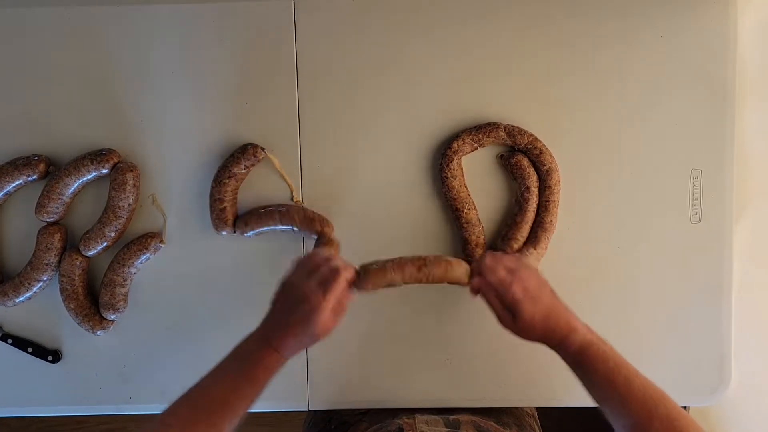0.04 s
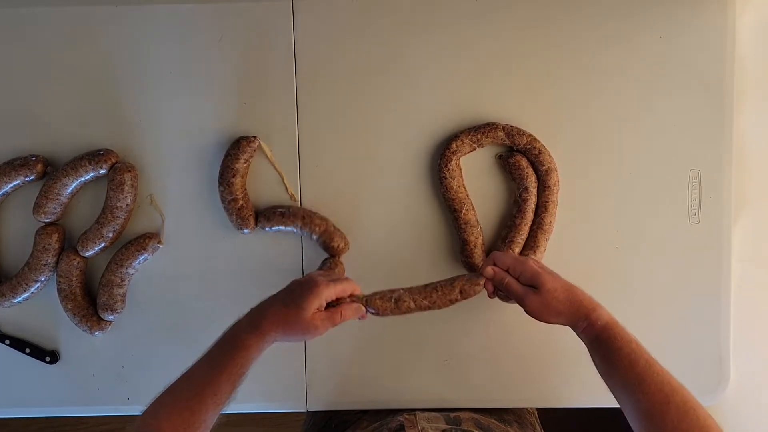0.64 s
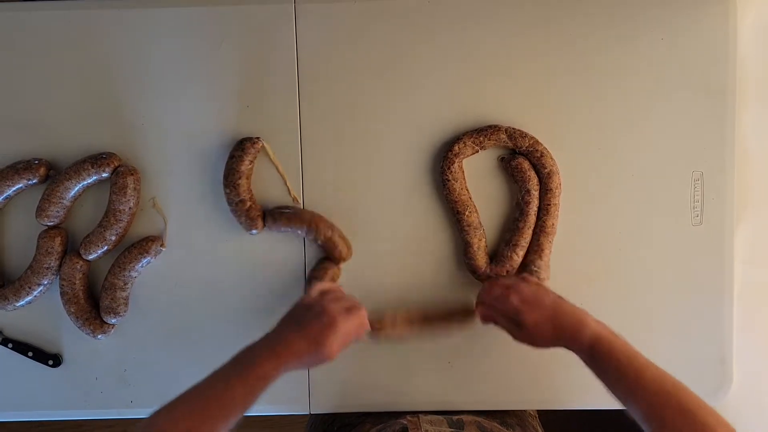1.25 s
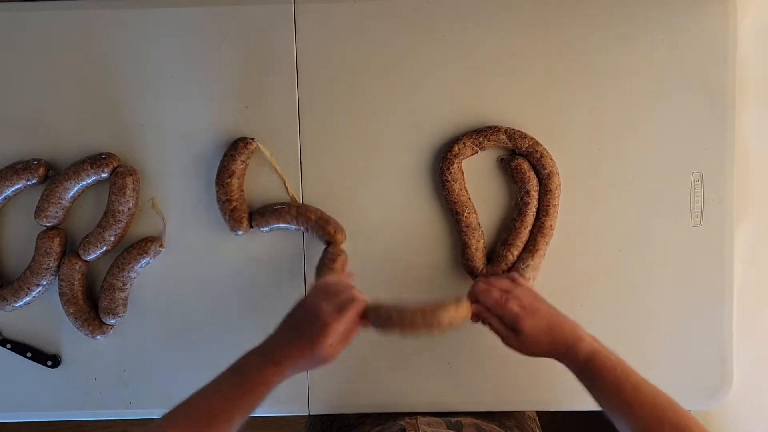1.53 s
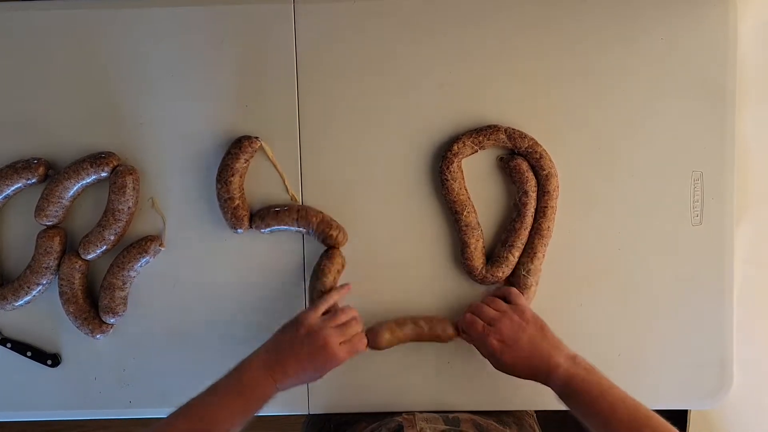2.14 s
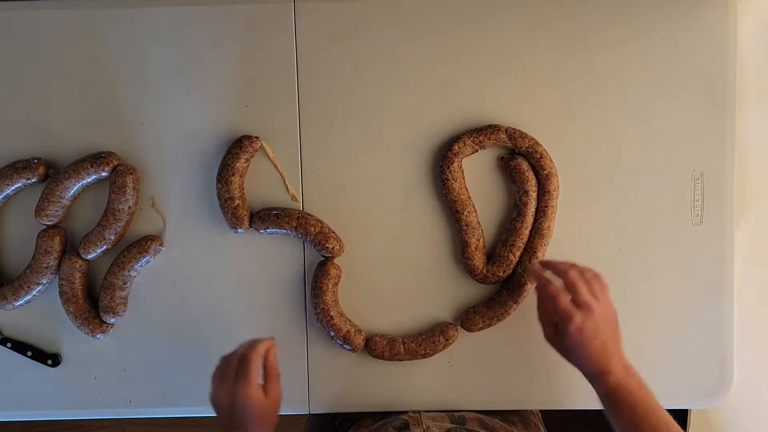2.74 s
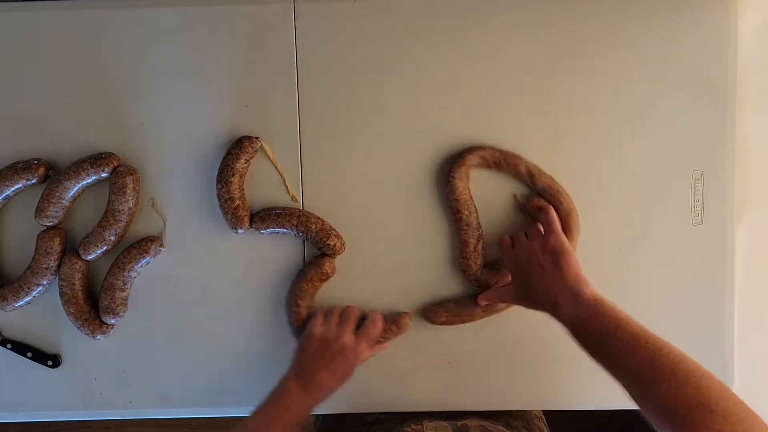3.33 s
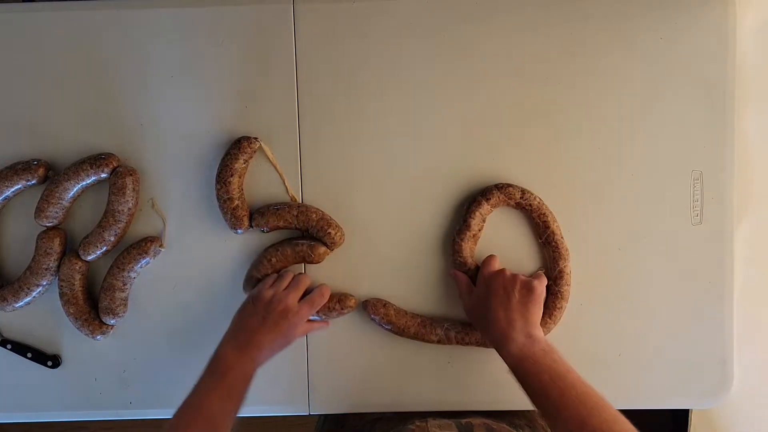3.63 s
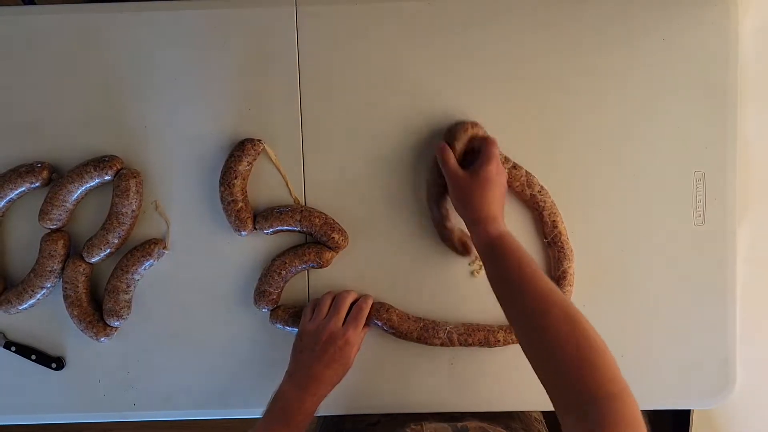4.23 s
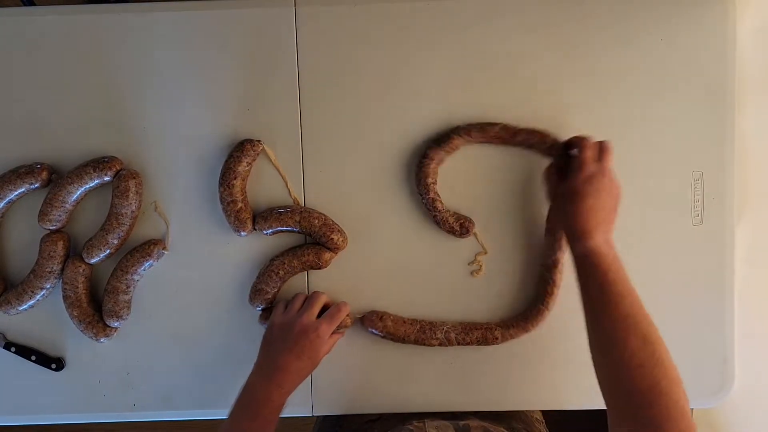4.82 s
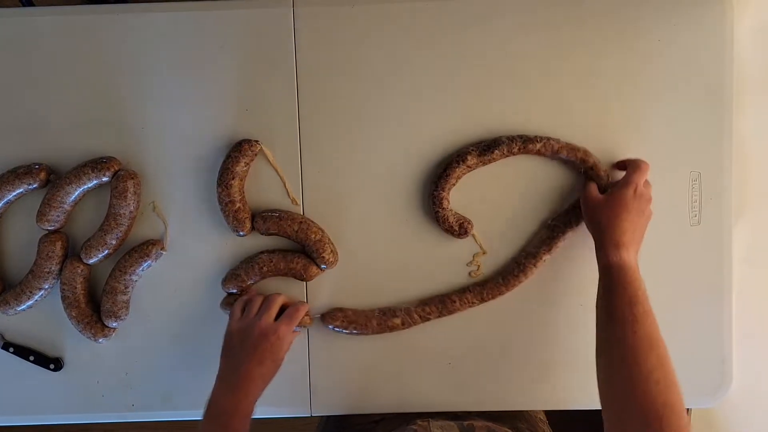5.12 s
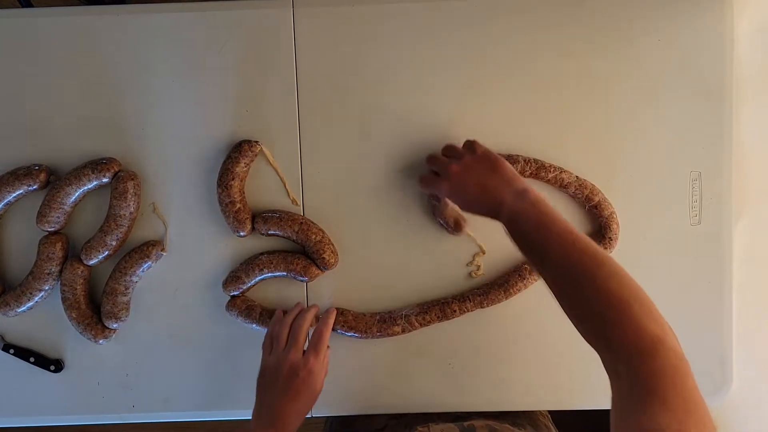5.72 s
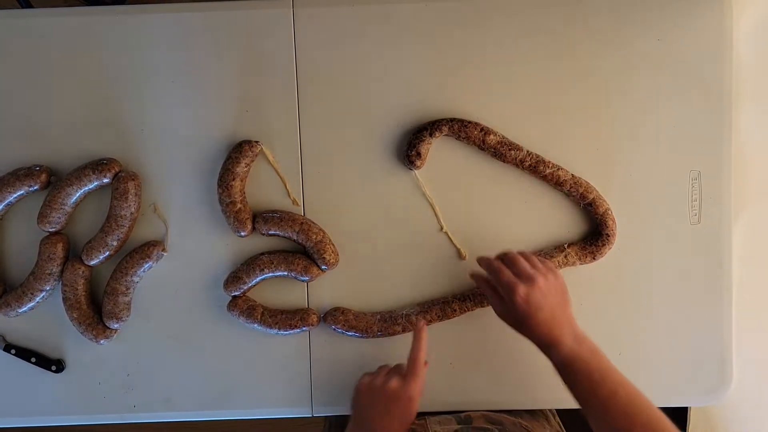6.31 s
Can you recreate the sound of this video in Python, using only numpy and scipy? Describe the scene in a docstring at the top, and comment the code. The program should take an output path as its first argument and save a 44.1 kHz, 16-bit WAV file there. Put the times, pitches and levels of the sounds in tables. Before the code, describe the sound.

Raw sausages smack and thump on a plastic tabletop, then are quietly shifted and dragged, with sticky ticks in a small room.

```python
"""Sausage links are twirled, dropped and dragged on a hollow plastic folding table in a small room.
Three hard slaps open it, each a wet smack over the low boom of the panel. After a tiny finger squeak
at 1 s comes a run of lighter slaps. From about 2.3 s hands shift the coil: squelching rubs, sticky
ticks, dull bumps, a few soft taps and a thin sliding hiss. A faint appliance hum goes on throughout."""
import sys
import numpy as np
from scipy import signal
from scipy.fft import rfft, irfft
from scipy.io import wavfile
from scipy.ndimage import uniform_filter1d

SR = 44100
rng = np.random.default_rng(int(sys.argv[2]) if len(sys.argv) > 2 else 0)


def log_audio(samples):
    """Write samples as a 16-bit WAV file to the path given in sys.argv[1]."""
    # one column per channel
    frames = np.atleast_2d(samples).T
    # limit to full scale, then quantise
    limited = np.clip(frames, -1, 1)
    pcm = np.round(limited * 32767).astype(np.int16)
    wavfile.write(sys.argv[1], SR, pcm)


N = 280464
HZ = np.fft.rfftfreq(N, 1 / SR)

# sausage slapping the table: t/s, relative smack level/dB, relative boom level/dB, contact time/s
SAUSAGE_SLAPS = [(0.0379, -17, -17, 0.0037), (0.2494, -15.5, -14.5, 0.0027), (0.4863, -19, -16, 0.0041),
                 (1.3186, -25, -36, 0.0031), (1.5088, -23.5, -27, 0.0021), (1.6785, -29.5, -29, 0.0063),
                 (1.8605, -23.5, -23.5, 0.0033), (2.057, -35, -37.5, 0.0049), (2.2228, -40, -39.5, 0.0063),
                 (2.2814, -38, -51, 0.0068), (4.037, -38.5, -61.5, 0.0026), (4.386, -47, -53, 0.0028),
                 (4.655, -41, -50, .0034), (5.374, -38, -54, 0.0022)]
# tone of wet casing meeting plastic: f/Hz, gain/dB
SMACK_EQ = [(100, -30), (350, 2), (700, -4.5), (1300, 1), (2000, -2), (2900, -6.5), (3600, -10.5),
            (4400, -15.5), (7300, -18.5), (8600, -26), (10500, -30), (12500, -16), (16000, -27.5)]
# tone of casing sliding: f/Hz, gain/dB
HISS_EQ = [(60, 2.5), (170, 0.5), (280, 3.5), (450, -2.5), (1300, -3), (3200, -3), (4600, -11.5),
           (7400, -9), (8500, -22), (10700, -19), (13000, -8.5), (16000, -15.5)]


def table_boom(boom_db=8, ring_db=-17.5, ring_per_db=0.6347, bump_t60_s=0.26):
    """The weight of each slap or bump sets the hollow top booming and its higher modes ringing."""
    # the whole top flexing, a close pair that swells and beats: f/Hz, relative level/dB
    flex_modes = [(64.5, 0), (76.5, -1.5)]
    # the dead thud of the push, then the higher panel modes: f/Hz, relative level/dB, t60/s
    panel_modes = [(146, 7.5, 0.037), (97.5, 1.5, 0.13), (218, -0.5, 0.1), (238.8, 0.5, 0.13),
                   (271.2, 1.5, 0.32), (333.8, -3, 0.16), (413, -17.5, 0.49), (519.5, -18.5, 0.45),
                   (607.4, -6, 0.12), (810, -17, 0.27), (958, -16, .13)]
    # hands and coil pressing on the top, with no smack: t/s, relative boom level/dB, ring level/dB
    bumps = [(0.125, -35, -46), (0.402, -44.5, -46), (1.279, -52, -57.5), (2.355, -47, -46.5),
             (3.1, -43.5, -48.5), (3.143, -44, -40), (4.261, -55.5, -58.5), (5.065, -59, -53.5),
             (5.6742, -36, -44.5)]
    out, t = np.zeros(N), np.arange(SR // 2) / SR
    push = 1 - np.exp(-t / 0.00093)  # soft meat loads the panel gradually
    blows = []
    for s, _, db, _ in SAUSAGE_SLAPS:
        t60 = np.interp(db, [-30.5, -19], [0.4, 0.23])  # a hard blow flattens the meat, damping the boom
        blows.append((s, db, ring_db + ring_per_db * db, t60))
    blows += [(*bump, bump_t60_s) for bump in bumps]
    for s, low_db, panel_db, t60 in blows:
        boom = ring([(hz, db, t60) for hz, db in flex_modes], t, scatter_db=4)
        panel = ring(panel_modes, t, scatter_db=3)
        add(out, s, push * (amp(low_db + boom_db) * boom + amp(panel_db) * panel))
    return room(out, direct_db=0, early_db=-30, tail_db=-22)[:, :N]


def ring(modes, t, scatter_db):
    """Dying modes of alternating sign; their strengths vary with the spot that is struck."""
    sizes = amp(scatter_db * rng.standard_normal(len(modes)))
    return sum((-1) ** k * sizes[k] * amp(db - 60 * t / t60) * np.sin(2 * np.pi * hz * t)
               for k, (hz, db, t60) in enumerate(modes))


def smacks(gain_db=-4.5, snap_db=12, pocket_hz=2916):
    """Wet casing meets plastic: trapped air snaps out in a quick burst of tiny clicks."""
    out, t = np.zeros((2, N)), np.arange(SR // 16) / SR
    for s, db, _, contact in SAUSAGE_SLAPS:
        envelope = (1 - np.exp(-t / 0.00046)) * np.exp(-t / contact)
        burst = envelope * rng.choice([-1., 1.], len(t))
        burst[SR // 1000] += amp(snap_db)
        smack = pocket(colour(burst, SMACK_EQ), pocket_hz, db=-1.5, q=2.7)
        add(out, s, amp(db + gain_db) * room(smack, direct_db=0, early_db=-3, tail_db=-6))
    return out


def pocket(x, hz, db, q):
    """A wet pocket under the casing resonates and gives a burst its pitch."""
    resonance = signal.lfilter(*signal.iirpeak(hz, q, SR), x)
    return x + amp(db) * x.std() * unit(resonance)


def ticks(gain_db=3):
    """Small patches of sticky casing let go, each with one bright click."""
    # casing coming unstuck: t/s, relative level/dB
    releases = [(0.127, -37.5), (0.214, -33), (1.612, -40), (2.244, -49), (2.371, -38), (2.504, -48),
                (3.197, -29), (5.066, -44), (5.385, -34)]
    out, t = np.zeros((2, N)), np.arange(SR // 100) / SR
    for s, db in releases:
        burst = np.exp(-t / 0.00061) * rng.choice([-1., 1.], len(t))
        tick = colour(burst, SMACK_EQ, tilt=2)
        add(out, s, amp(db + gain_db) * room(tick, direct_db=0, early_db=-3, tail_db=-7))
    return out


def rubs(gain_db=-1):
    """Moist casing is rubbed or peeled: each short squelch swells and crackles away."""
    # strokes on the casing: t/s, relative level/dB, length/s, squelch f/Hz
    strokes = [(0.21, -38, 0.023, 2040), (1.191, -60, 0.037, 3280), (1.398, -54.5, .04, 3070),
               (1.586, -53, 0.037, 2360), (1.825, -51.5, 0.02, 3160), (2.222, -41.5, 0.05, 600),
               (2.228, -46.5, 0.023, 13000), (2.418, -55.5, 0.11, 2480), (2.49, -44.5, 0.023, 2800),
               (3.122, -41.5, 0.058, 3100), (3.188, -30.5, 0.036, 2670), (3.675, -47.5, 0.021, 785),
               (3.738, -50.5, 0.042, 2180), (3.777, -47.5, 0.025, 2980), (3.895, -55, 0.12, 2500),
               (4, -47.5, 0.015, 2770), (4.377, -50, 0.055, 1850), (4.577, -43.5, 0.025, 1520),
               (4.642, -45, .044, 2480), (4.744, -48.5, .047, 2970), (4.764, -43.5, 0.049, 590),
               (5.365, -41.5, 0.037, 1940), (5.619, -37, 0.035, 265), (5.644, -48.5, 0.063, 3060),
               (6.004, -55, 0.042, 580), (6.049, -58, 0.056, 3150)]
    # tone of a moist rub: f/Hz, gain/dB
    squelch_eq = [(60, -4.5), (170, -3.5), (280, 4.5), (430, -6), (650, 1.5), (1300, 2), (2200, 2),
                  (3200, -0.5), (4300, -5), (7300, -9), (8600, -20.5), (10800, -20), (12800, -11.5),
                  (16000, -28.5)]
    # the tighter the squelch, the brighter the whole rub: squelch f/Hz, tilt/(dB per octave)
    brightness = [(270, -5.5), (1600, -3.5), (3100, -1.5), (13000, 7)]
    out = np.zeros((2, N))
    for s, db, length, hz in strokes:
        progress = np.linspace(0, 1, int(length * SR))
        swell = np.sin(np.pi * progress ** .5)
        stroke = unit(swell * grains(SR // 8, spread_db=3)[:len(swell)])
        squelch = pocket(colour(stroke, squelch_eq, read(brightness, hz)), hz, db=-5, q=5.5)
        add(out, s, amp(db + gain_db) * room(squelch, direct_db=-5, early_db=-7, tail_db=-9))
    return out


def squeak(start_s=1.033, gain_db=-50, length_s=.015, centre_hz=1500, glide=0.058, rough=0.56):
    """A finger slips on the casing with a short rising chirp."""
    out, sweep = np.zeros((2, N)), np.linspace(-1, 1, int(length_s * SR))
    grip = 1 + rough * unit(uniform_filter1d(rng.standard_normal(len(sweep)), size=24))
    phase = 2 * np.pi * np.cumsum(centre_hz * (1 + glide * sweep)) / SR
    chirp = grip * np.cos(np.pi * sweep / 2) * np.sin(phase)
    add(out, start_s, amp(gain_db) * room(chirp, direct_db=0, early_db=-12, tail_db=-14, lag_s=.0001))
    return out


def slide(gain_db=-2, fingers_db=-69):
    """The drags of the coil, over the faint rustle of fingers that never quite stop."""
    # the coil dragged or twirled over the top: t/s, length/s, relative level/dB, tilt/(dB per octave)
    drags = [(0, 0.67, -53, -1), (1.14, 1, -58, 0), (2.099, 0.47, -59, -1.5), (3.18, 0.53, -56, 1.5),
             (3.871, 0.58, -64.5, 2), (4.749, 0.4, -54.5, -0.9), (5.048, 0.51, -58.5, -2),
             (5.702, 0.25, -62.5, 0)]
    out = np.zeros(N)
    for s, length, db, tilt in drags:
        add(out, s, amp(db + gain_db) * drag(length, tilt))
    add(out, 0, amp(fingers_db + gain_db) * colour(grains(N, spread_db=6.5), HISS_EQ))
    return room(out, direct_db=-9, early_db=-1.5, tail_db=-7.5)[:, :N]


def drag(length, tilt, attack_s=0.031, release_s=.16, uneven_db=1.5, crackle_db=-11, clicks_per_s=45):
    """Casing hisses over plastic, gathers speed quickly and coasts to rest, clicking as it unsticks."""
    t = np.arange(2 * SR) / SR
    grip = unit(uniform_filter1d(rng.standard_normal(len(t)), size=1200))
    speed = np.minimum(t / attack_s, 1) * np.clip((length - t) / release_s, 0, 1)
    level = speed * amp(uneven_db * grip)
    hiss = colour(level * grains(len(t), spread_db=4), HISS_EQ, tilt)
    clicks = unit(rng.standard_normal(len(t)) * (rng.random(len(t)) < clicks_per_s / SR))
    return hiss + amp(crackle_db) * colour(level * clicks, SMACK_EQ, tilt=4.7)


def grains(count, spread_db):
    """Dense stick-slip clicks of uneven size."""
    return unit(rng.standard_normal(count) * amp(spread_db * np.minimum(rng.exponential(1, count), 5)))


def room_tone(air_db=-61.5):
    """Still room air and the narrow, wavering noise bands of an appliance hum."""
    # tone of the room air: f/Hz, gain/dB
    air_eq = [(15, -47.5), (25, -25), (43, 3.5), (212, -14.5), (236, -10.5), (363, -11.5), (489, -12),
              (796, -10), (1070, -16.5), (1160, -13), (1440, -16), (2910, -19.5), (3250, -25),
              (3520, -29.5), (16000, -47)]
    # appliance hum: f/Hz, level/dB, width/Hz
    hum_bands = [(54, -96, 6.6), (104.4, -72, 5.6), (152.5, -81, 5.1), (268.5, -75.5, 21), (815, -67, 45),
                 (2750, -87, 150)]
    noise = lambda shape: unit(irfft(rfft(rng.standard_normal((2, N))) * shape, N))
    hum = sum(amp(db) * noise(1 / (1 + (2 * (HZ - hz) / width) ** 2)) for hz, db, width in hum_bands)
    air = amp(air_db) * noise(amp(read(air_eq, HZ)))
    return diffuse(air + hum)


def room(x, direct_db, early_db, tail_db, early_s=0.014, lag_s=.0003, size=16384):
    """Direct sound, right first; a spray of near reflections; then the tail, different from every spot."""
    # reverb decay of the small room: f/Hz, t60/s
    decay = [(100, 0.21), (300, 0.64), (1000, 0.31), (3000, 0.25), (7000, 0.32), (15000, 0.029)]
    t = np.arange(size) / SR
    echoes = rng.choice([-1., 1.], (2, size)) * (rng.random((2, size)) < 6000 / SR)
    taps = diffuse(echoes) * (t > .001)
    early = taps[:, ::-1] * (t > .001) * np.exp(-t / early_s)
    hz, age, spectra = signal.stft(taps, SR, nperseg=256)
    fade = amp(-60 * age / read(decay, hz)[:, None])
    tail = signal.istft(spectra * fade, SR, nperseg=256)[1][:, :size]
    response = (amp(tail_db) * unit(tail) + amp(early_db) * unit(early)) / np.sqrt(size)
    response[[0, 1], [round(lag_s * SR), 0]] += amp(direct_db)
    return signal.fftconvolve(x[None], response, axes=1)


def diffuse(two):
    """Two unrelated signals become a diffuse stereo field, narrow in the bass and wide above."""
    # likeness of left and right: f/Hz, coherence
    coherence = [(60, 0.71), (130, 1), (290, 0.68), (640, -0.078), (1410, -0.21), (3100, 0.043),
                 (15000, 0.27)]
    a, b = rfft(two)
    same = read(coherence, np.fft.rfftfreq(two.shape[1], 1 / SR))
    mid, side = a * np.sqrt((1 + same) / 2), b * np.sqrt((1 - same) / 2)
    return irfft(np.array([mid + side, mid - side]), two.shape[1])


def colour(x, eq, tilt=0, size=2048):
    """Minimum-phase EQ of unit energy, tilted in dB per octave above 400 Hz."""
    hz = abs(np.fft.fftfreq(size, 1 / SR))
    log_gain = np.log(amp(read(eq, hz) + tilt * np.log2(np.maximum(hz, 400) / 1000)))
    taps = np.fft.ifft(np.exp(np.conj(signal.hilbert(log_gain)))).real[:size // 2]
    return signal.fftconvolve(x, taps / np.linalg.norm(taps))


def amp(db):
    """Decibels to gain."""
    return 10 ** (np.asarray(db) / 20)


def unit(x):
    """Scales to rms 1."""
    return x / np.sqrt(np.mean(x ** 2) + 1e-20)


def read(points, hz):
    """Reads a curve on a log-frequency axis."""
    f, value = np.transpose(points)
    return np.interp(np.log(hz + 1), np.log(f + 1), value)


def add(mix, s, sound):
    """Mixes a sound in at s seconds."""
    part = mix[..., max(round(s * SR), 0):][..., :sound.shape[-1]]
    part += sound[..., :part.shape[-1]]


def scene():
    """Table, casing and hum in one room."""
    return table_boom() + smacks() + ticks() + rubs() + squeak() + slide() + room_tone()


def record(dry, low_cut_hz=38, high_cut_hz=16100):
    """The two microphones each have their own colour and shed the deepest bass and the top treble."""
    # stereo balance: f/Hz, left minus right/dB
    balance = [(60, 0.5), (250, 2.5), (700, -0.5), (1300, 0), (2400, -4), (4400, -3), (8000, 0),
               (15000, 7.5)]
    side_gains = amp(np.outer([.5, -.5], read(balance, HZ)))
    low_cut = HZ ** 2 / np.hypot(HZ ** 2, low_cut_hz ** 2)
    heard = irfft(rfft(dry) * side_gains * low_cut, N)
    high_cut = signal.firwin(511, high_cut_hz, window=("kaiser", 9), fs=SR)
    return signal.oaconvolve(heard, high_cut[None], "same")


dry = scene()
out = record(dry)
log_audio(out)
```